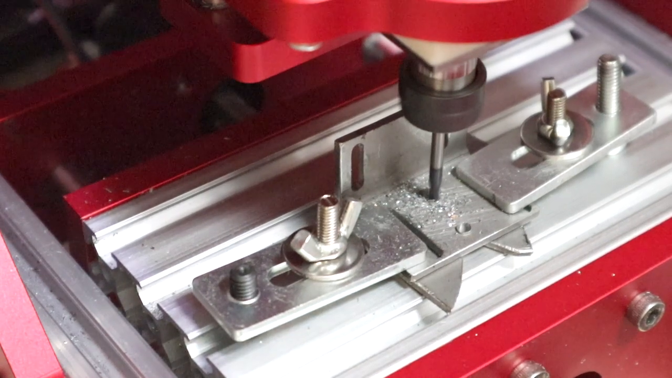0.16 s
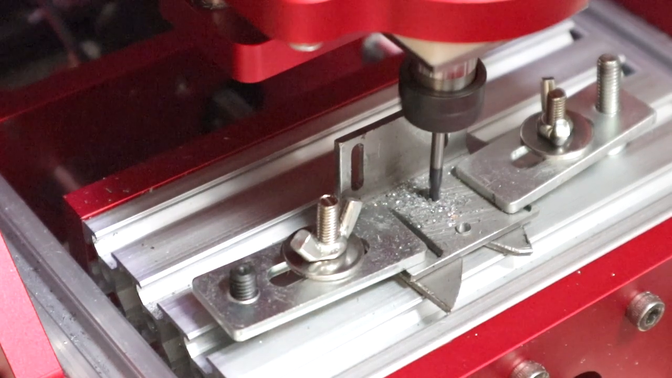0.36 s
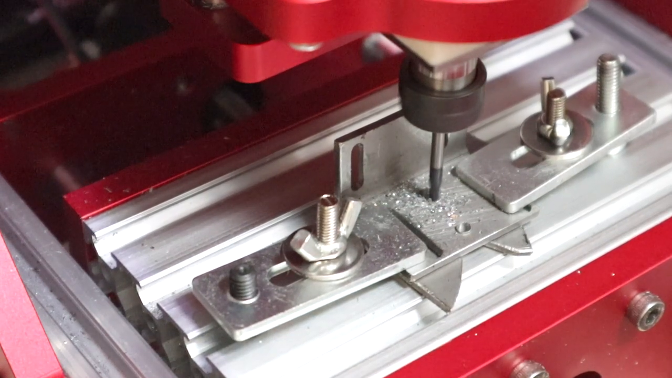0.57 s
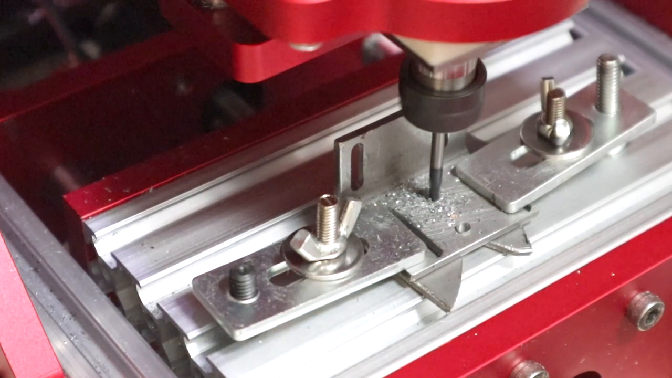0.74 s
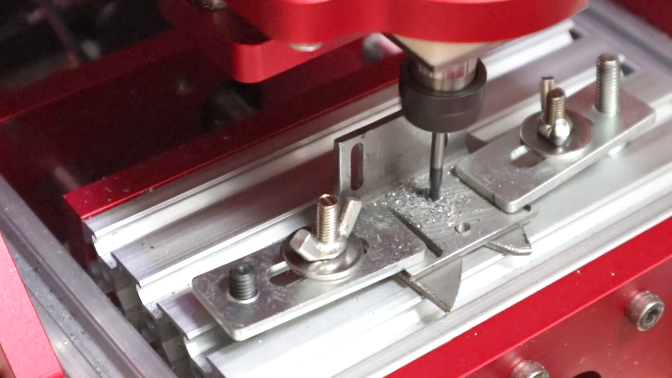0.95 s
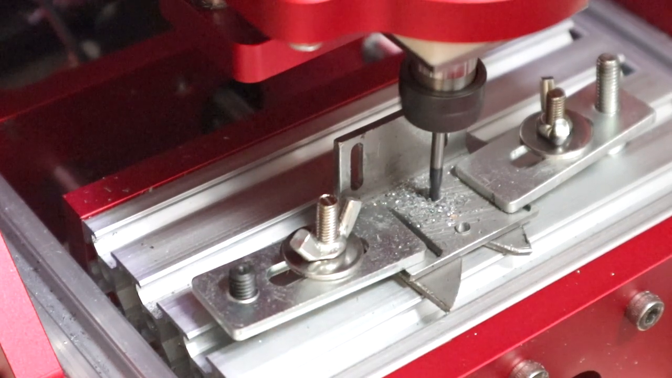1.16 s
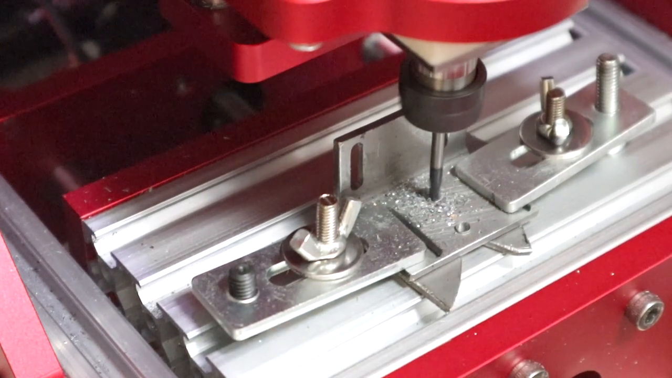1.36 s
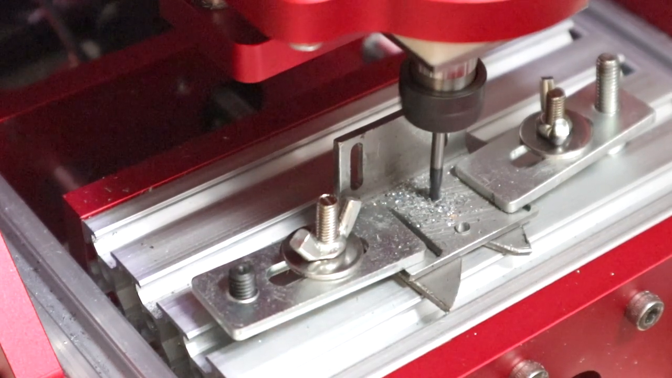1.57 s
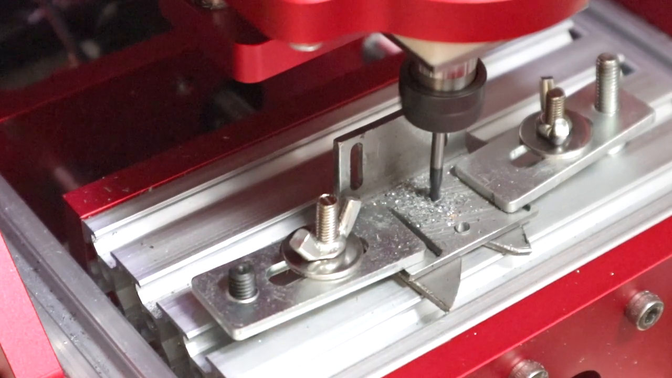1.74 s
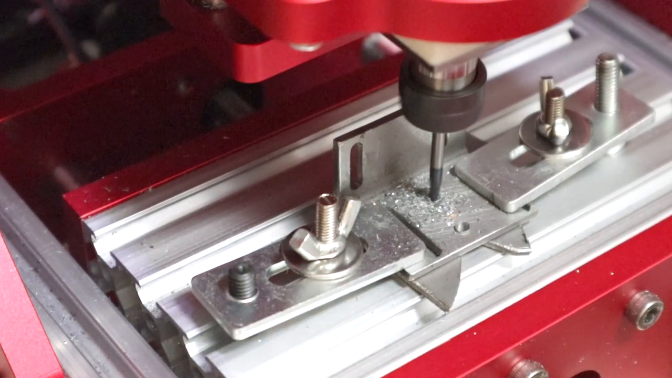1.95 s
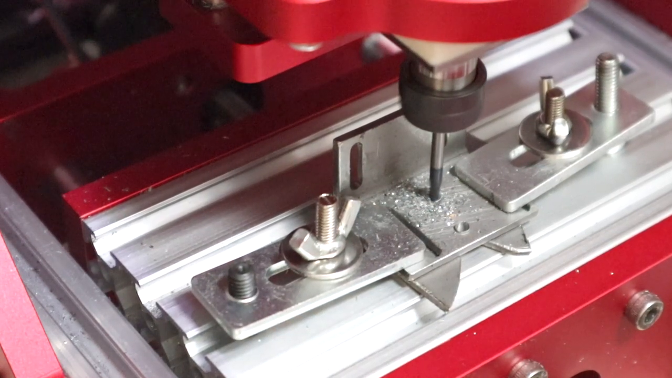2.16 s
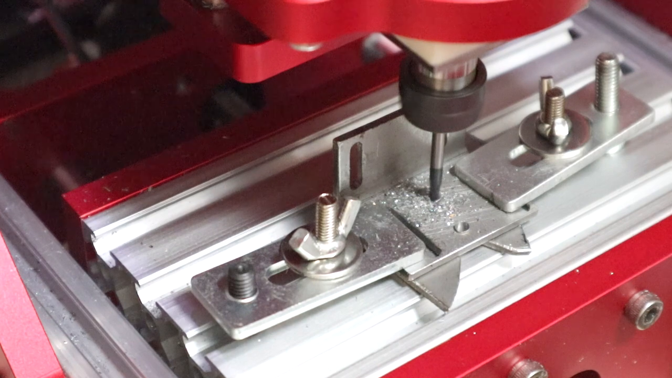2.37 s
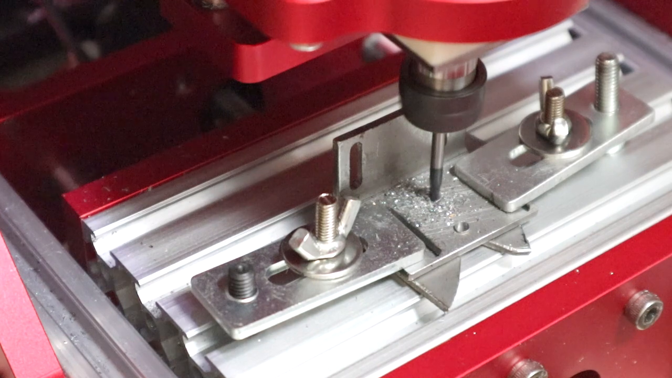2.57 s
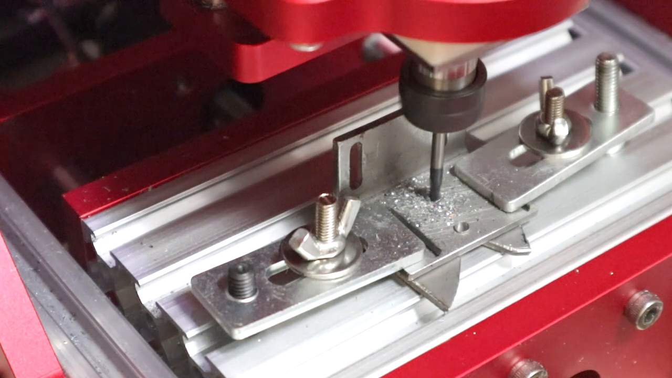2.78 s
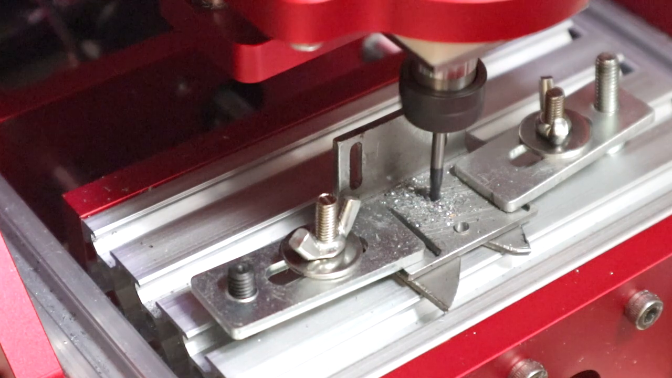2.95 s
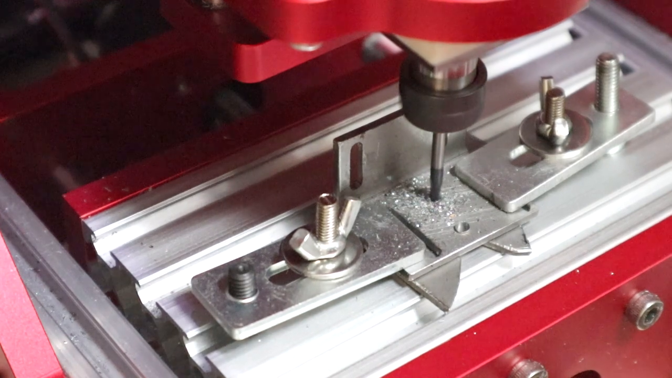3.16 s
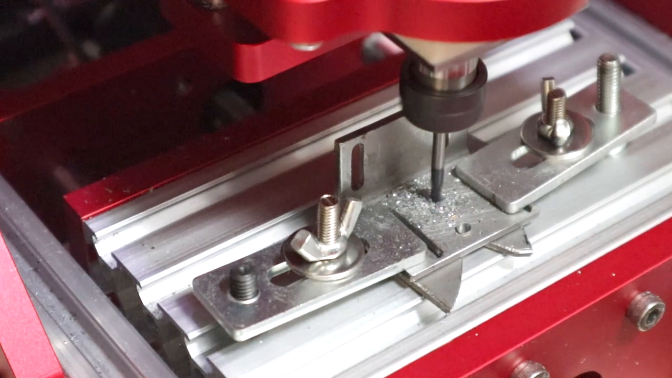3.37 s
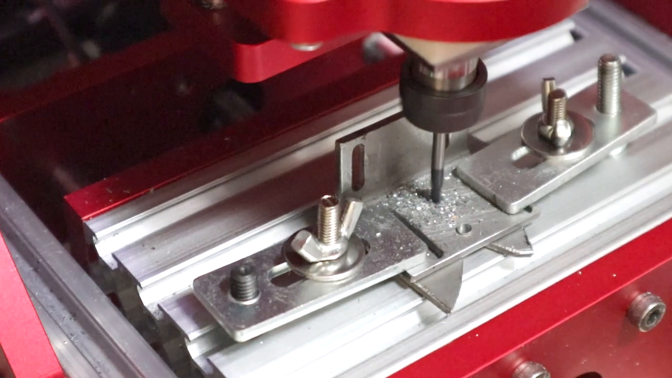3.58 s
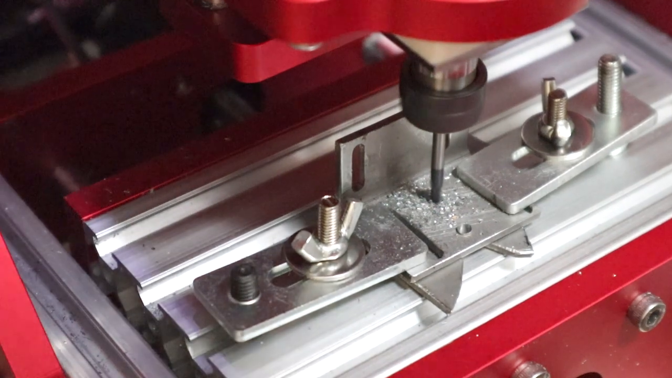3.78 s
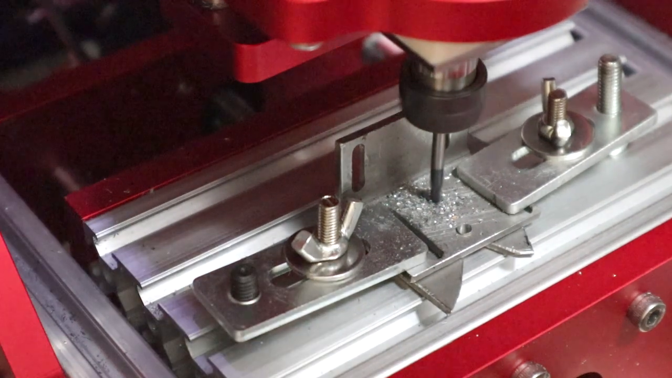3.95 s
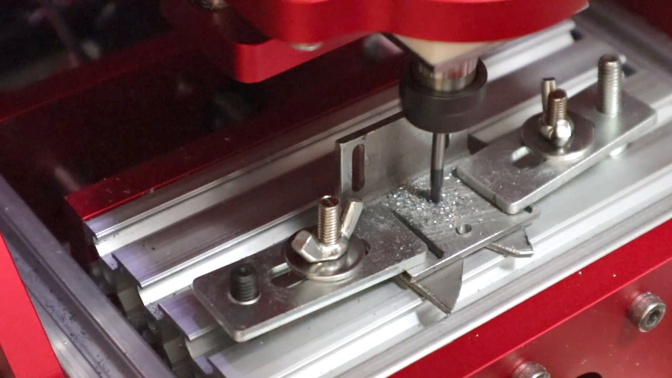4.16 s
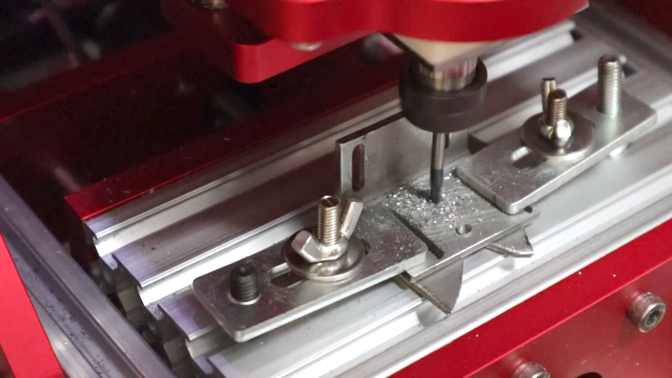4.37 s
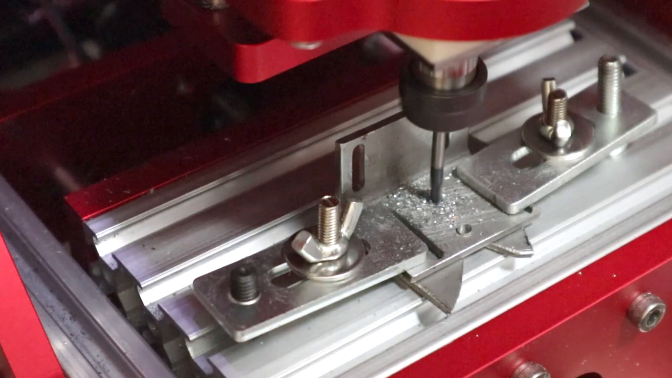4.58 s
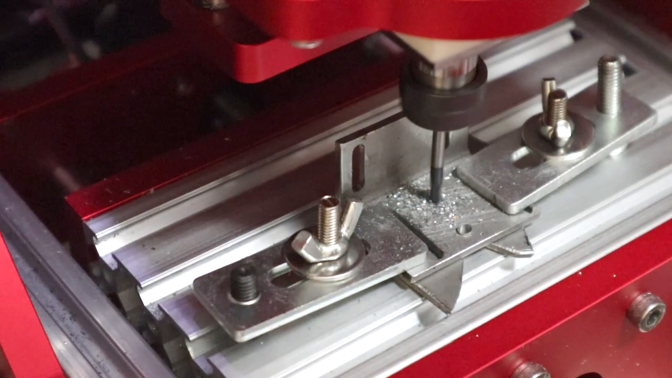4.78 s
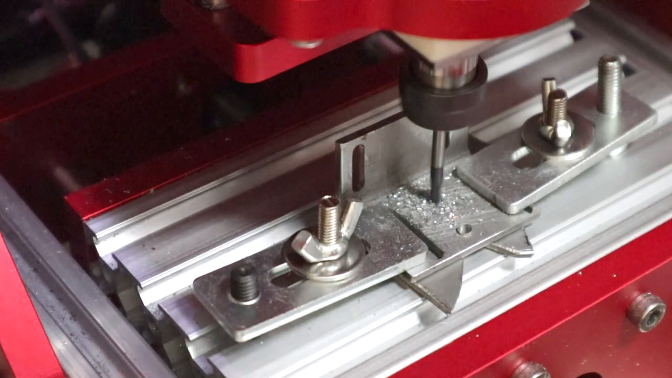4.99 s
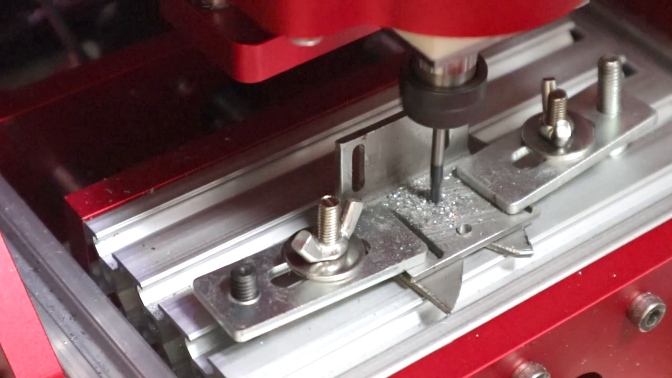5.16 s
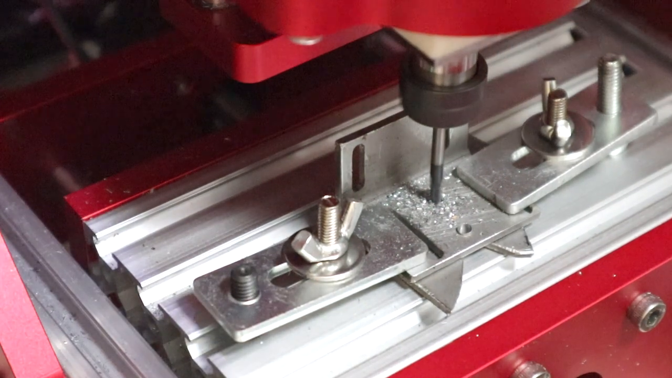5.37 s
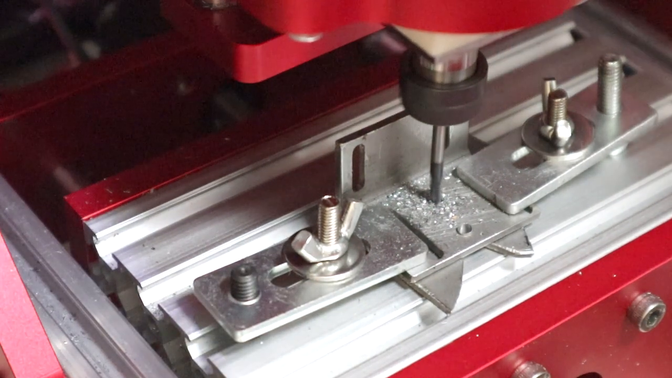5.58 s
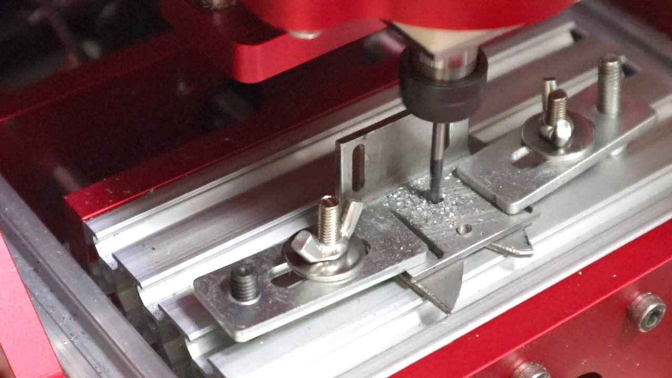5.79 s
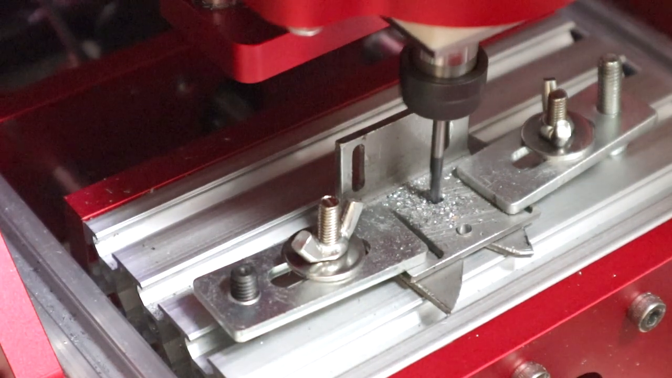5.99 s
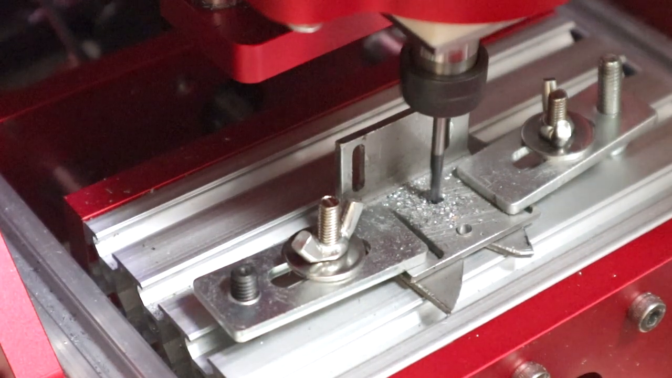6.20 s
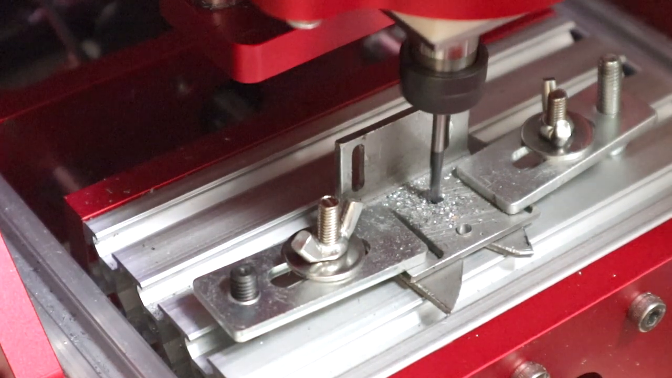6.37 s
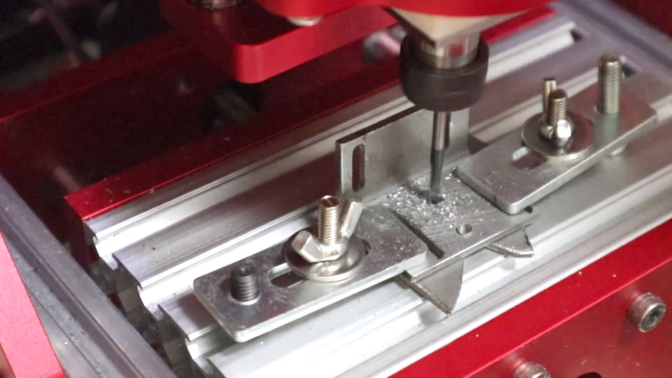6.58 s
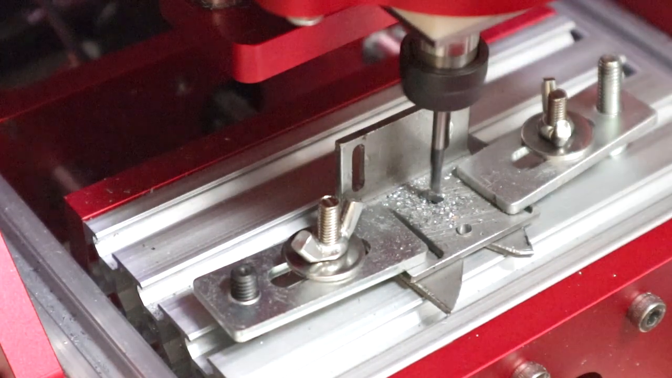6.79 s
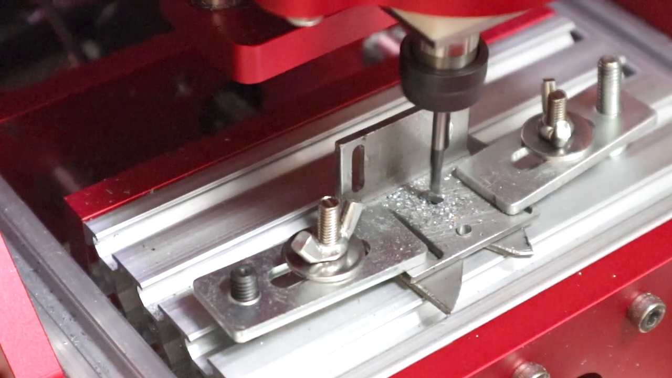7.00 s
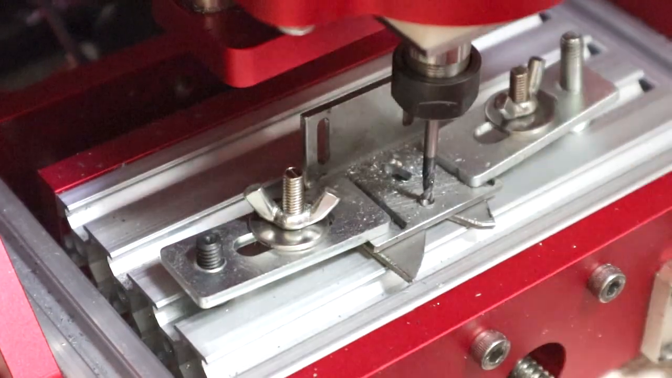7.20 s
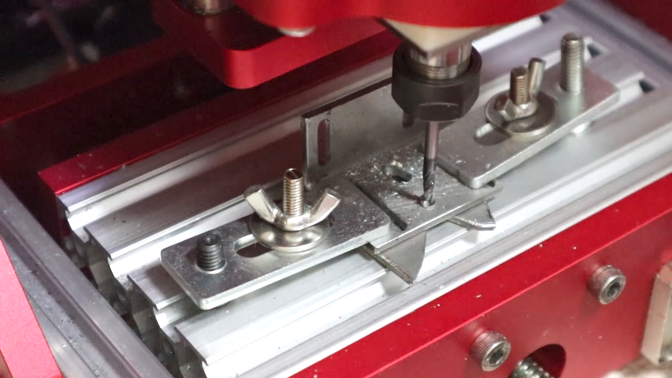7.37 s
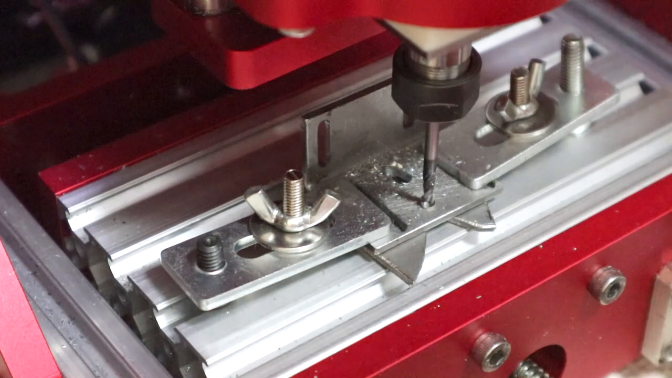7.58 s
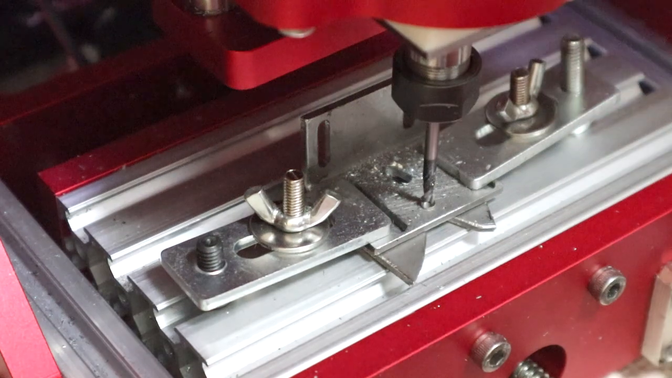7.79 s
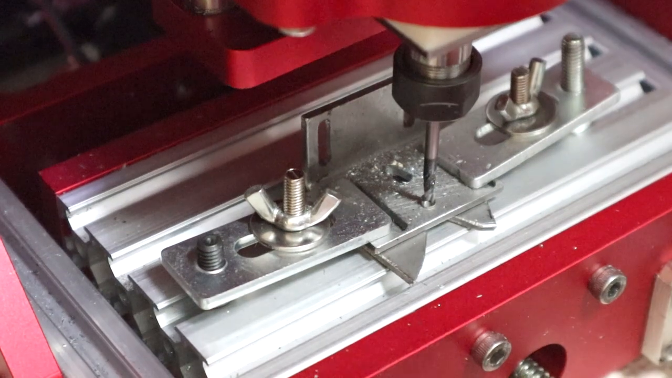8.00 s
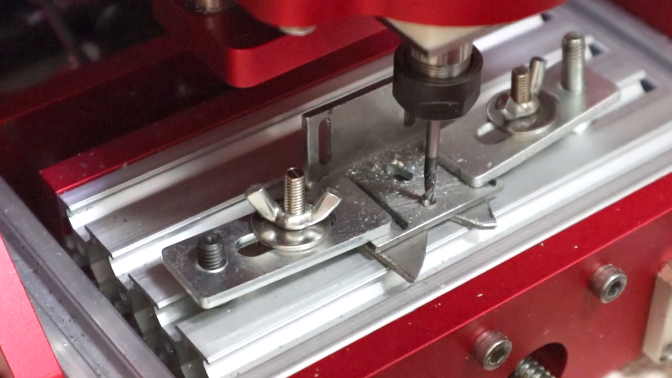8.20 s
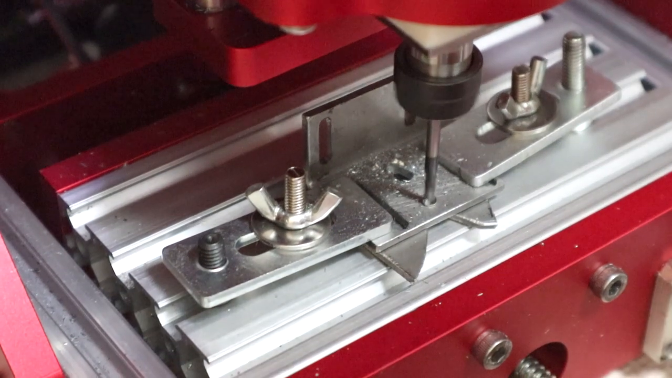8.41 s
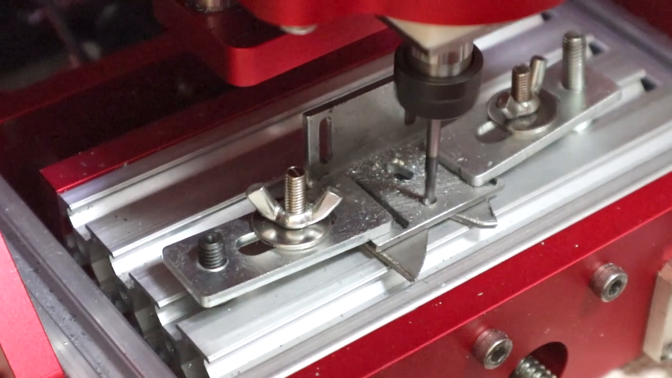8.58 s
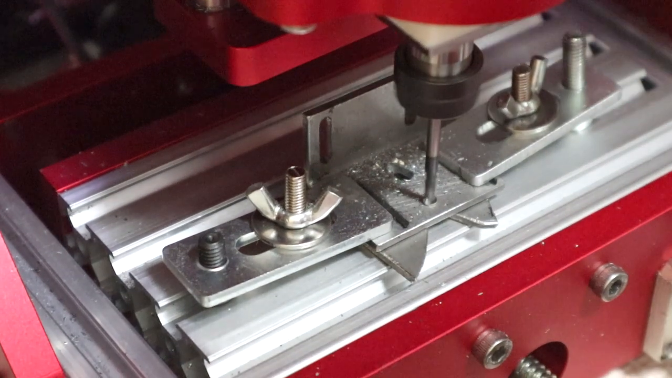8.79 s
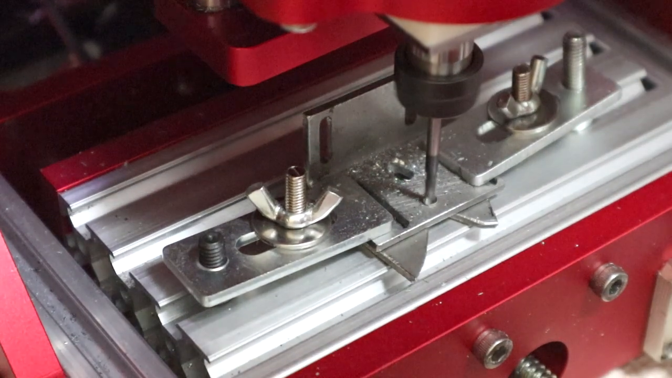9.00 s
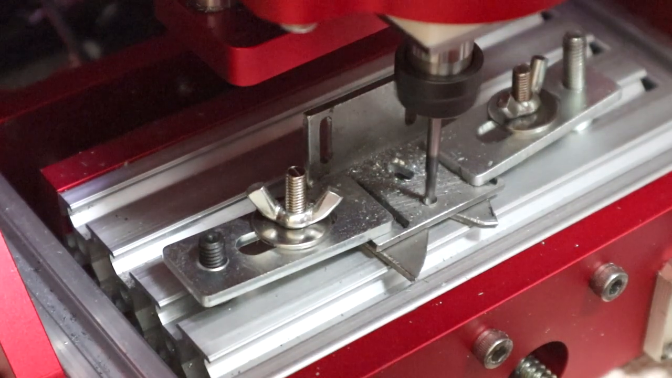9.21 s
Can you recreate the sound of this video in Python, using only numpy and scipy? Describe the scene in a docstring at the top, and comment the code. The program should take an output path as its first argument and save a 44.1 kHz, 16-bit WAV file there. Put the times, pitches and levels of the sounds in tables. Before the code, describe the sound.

Close, gritty metal milling with buzzing chatter and scraping, a freer motor whine, a sudden one-second hush, then a click and spindle restart.

```python
"""A small geared milling machine cuts a thin metal plate, heard from close by.
The cutter's teeth (flutes) shake the clamped plate: chatter at first, then a steady three beats a turn.
Noise in coloured bands makes the gritty chips, the scrape and the hiss; sine tones make the whining gears.
The cutter comes free and the motor whines higher. The sound breaks off and only the quiet room is left,
until a switch restarts the spindle and the gears knock as they settle."""
import sys
import numpy as np
from scipy import signal
from scipy.fft import rfft, irfft, next_fast_len
from scipy.io import wavfile
from scipy.ndimage import uniform_filter1d

SR = 44100
rng = np.random.default_rng(int(sys.argv[2]) if len(sys.argv) > 2 else 0)


def transcribe(u):
    """Save the signal u as a 16-bit wav file named by the first command-line argument.

    u: samples, shape (n,) or (channels, n), limited to [-1, 1]; the rate is SR.
    q: integer samples, one column per channel.
    """
    v = np.clip(np.atleast_2d(u).T, -1, 1)
    q = np.round(v * 32767).astype(np.int16)
    wavfile.write(sys.argv[1], SR, q)


N = 407925
TIME = np.arange(N) / SR  # seconds

# the cutting edge catches: t/s, strength of the blow/dB
SNAGS = [(3.285, -22), (3.374, -24), (3.803, -24), (3.947, -21), (4.06, -24), (4.157, -12), (4.475, -20),
         (4.528, -20), (5.091, -18.5), (5.408, -23), (5.454, -17)]

PINION_TEETH = 16
GEAR_RATIO = 30 / PINION_TEETH  # motor turns per spindle turn
GRIP_S = 3.33  # the cutter takes hold
BREAK_S, RESUME_S, SWITCH_S = 7.166, 7.197, 8.345  # sound breaks off, room returns, switch closes


def undb(db):
    """Turn decibels into a gain."""
    return 10 ** (np.asarray(db) / 20)


def unit(x):
    """Scale to an average (rms) level of 1."""
    return x / np.sqrt(np.mean(np.abs(x) ** 2))


def curves(table):
    """Join the points of a table by straight lines: one curve for each column after the time."""
    t, *columns = np.transpose(table)
    return [np.interp(TIME, t, column) for column in columns]


def colour(x, points):
    """Filter by a spectrum of (Hz, dB) points."""
    size = next_fast_len(N + 4096)
    hz, db = np.transpose(points)
    f = np.maximum(np.arange(size // 2 + 1) * SR / size, 1)
    gain = undb(np.interp(np.log(f), np.log(hz), db))
    return irfft(rfft(x, size) * gain, size)[:N]


def noise():
    """White noise: all frequencies equally strong."""
    return rng.standard_normal(N)


def wander(rate):
    """A smooth random curve with spread 1, changing about rate times a second."""
    smoother = signal.butter(2, rate, fs=SR, output="sos")
    return unit(signal.sosfilt(smoother, noise()))


def resonance(x, hz, width_hz):
    """One resonance rung by x, at rms 1."""
    edges = [hz - width_hz / 2, hz + width_hz / 2]
    band = signal.butter(2, edges, "band", fs=SR, output="sos")
    return unit(signal.sosfilt(band, x))


def bump(s, length_s):
    """A smooth swell from 0 to 1 and back, centred on s."""
    return np.exp(-((TIME - s) / length_s) ** 2)


def ramp(s, length_s):
    """A straight rise from 0 to 1, starting at s."""
    return np.clip((TIME - s) / length_s, 0, 1)


def between(start, end, fade_s):
    """1 from start to end, fading in and out."""
    return np.clip(np.minimum(TIME - start, end - TIME) / fade_s, 0, 1)


def stereo(mid, side):
    """Direct sound in the middle, reflections from the machine's frame to the sides."""
    # how strongly the frame reflects each frequency: f/Hz, side level/dB
    width = [(100, -41.5), (200, -42), (330, -22.5), (620, -26.5), (1100, -27), (2200, -19.5),
             (3600, -10.5), (6300, -3.5), (11000, 3.5)]
    return mid + np.array([[1], [-1]]) * colour(side, width)


def spread(source, side_db=0):
    """Two draws of a noisy source, as direct and reflected sound."""
    return stereo(source(), source() * undb(side_db))


def recur(x, turns, share):
    """Part of what happens on one turn happens again on the next two."""
    one_ago = np.interp(turns - 1, turns, x)
    two_ago = np.interp(turns - 2, turns, x)
    return (x + share * one_ago + share ** 2 * two_ago) / np.sqrt(1 + share ** 2 + share ** 4)


def chips(turns, repeat, grain_db):
    """Tiny fractures around the cutter's rim; the share repeat of their pattern returns on the next turn."""
    cells = 800  # fractures in one turn
    shape = (700, cells)
    uneven_db = grain_db * np.minimum(rng.exponential(size=shape), 6)
    fresh = rng.standard_normal(shape) * undb(uneven_db)
    pattern = signal.lfilter([1], [1, -np.clip(repeat, 0, .95)], fresh, axis=0).ravel()
    return pattern[(turns * cells).astype(int) % pattern.size]


def engagement(leave_s=5.464, release_s=0.28):
    """1 while the cutter is in the plate, dying away as it comes free."""
    return np.exp(-np.maximum(TIME - leave_s, 0) / release_s)


def spindle(restart_hz=58.41, spin_up_s=.021):
    """Turns made so far: the speed follows the cut, and runs up from rest after the switch."""
    # speed sags while the cutter chatters and recovers as it works through: t/s, turns per second f/Hz
    speed = [(0, 53.3), (.5, 52.8), (2.35, 52.62), (3.05, 53.33), (3.2, 53.72), (3.35, 54.84), (3.7, 55.9),
             (4.1, 56.64), (5.0, 57.09), (5.3, 57.4), (6.0, 57.83), (7.2, 57.9)]
    run_up = restart_hz * (1 - np.exp(-np.maximum(TIME - SWITCH_S, 0) / spin_up_s))
    return np.cumsum(np.where(TIME < SWITCH_S, curves(speed)[0], run_up)) / SR


def beats(steady, entry_db=-3.5, entry_s=1.55, grip_db=-11, grip_s=0.091, ease_s=4.75, ease_db_per_s=-5.5,
          chatter_ends=0.62, chatter_left=0.022, chatter_grow_s=0.17, swell_hz=2.4, swell_depth_db=1):
    """Strengths of two beats, three beats and chatter: chatter gives way to three beats as the cut steadies."""
    # two beats build as the cutter enters, drop out as it takes hold and ease towards the far edge
    two_db = entry_db * (1 - ramp(0, entry_s)) + grip_db * bump(GRIP_S, grip_s)
    two_db = two_db + ease_db_per_s * np.maximum(TIME - ease_s, 0)
    swell_db = swell_depth_db * np.cos(2 * np.pi * swell_hz * (TIME - GRIP_S))
    two = undb(-23.5 + two_db) * np.sqrt(engagement())
    three = undb(-17 + swell_db) * steady * np.sqrt(engagement())
    unsteady = np.maximum(1 - steady / chatter_ends, chatter_left)
    chatter = undb(-20.5) * unsteady * ramp(0, chatter_grow_s) * engagement()
    return two, three, chatter


def shake(turns, steady, fourth_db=-21, chatter_fourth_db=-14, sideband_db=-16, chatter_slip=0.13):
    """The clamped plate answers the flutes with low tones; chatter repeats only every second turn."""
    two, three, chatter = beats(steady)
    angle = 2 * np.pi * turns
    slip = chatter_slip * wander(24)
    four = undb(fourth_db) * (two + three) + undb(chatter_fourth_db) * chatter * ramp(0.48, 0.68)
    whole = two * np.sin(2 * angle) + three * np.sin(3 * angle) + four * np.sin(4 * angle + 1 + 3 * slip)
    # half multiples of the turn need two turns to repeat
    halves = np.sin(7 * angle / 2 + slip) + undb(sideband_db) * np.sin(9 * angle / 2 + slip)
    return np.sqrt(2) * (whole * undb(.5 * wander(26)) + chatter * halves * undb(0.69 * wander(6)))


def cutting(turns, depth_db, steady, bite=0.12, burst_db=3.0, crunch_burst_db=2.0, scrape_slope=1.6,
            surge_db=1.7, surge_s=0.1, ring_db=-6, shank_hz=3290, shank_width_hz=460):
    """The frame judders, chips crunch, the edge scrapes (surging at snags) and the cutter's shank rings."""
    # colours of the shaking frame, the breaking chips and the scraping edge, each: f/Hz, level/dB
    judder_colour = [(30, -25), (55, -9), (85, -6.5), (125, -4), (160, -1), (205, -1), (250, -5),
                     (300, -14.5), (370, -22.5), (455, -13.5), (540, -20.5), (800, -29.5), (2000, -53.5)]
    crunch_colour = [(150, -11), (330, -1.5), (530, -7.5), (700, -5), (870, -4.5), (1000, -8.5),
                     (1130, 2.5), (1230, -2.5), (1450, -0.5), (1650, -2.5), (1850, -6.5), (2100, -9),
                     (3000, -14.5), (6000, -42.5)]
    scrape_colour = [(1000, -13), (2000, -15), (2500, -4.5), (2850, 4), (3300, -3), (3700, 0),
                     (3900, -10.5), (4500, -4.5), (5150, -7), (5600, -13), (8000, -14), (11500, -43)]
    surge = surge_db * sum(bump(s, surge_s) for s, db in SNAGS)
    undecided = np.sin(np.pi * steady) ** 2  # half way between chatter and an even cut: most judder
    judder = undb(-26.5 - 12.5 * steady ** 2 + 4 * undecided) * engagement()
    crunch = undb(-25.5 + depth_db)
    scrape = undb(-31 + scrape_slope * depth_db + surge)
    contact = 1 + bite * np.sin(2 * np.pi * turns)  # hardest at one point of each turn
    tearing = wander(110)
    bursts = contact * undb(burst_db * (tearing + wander(24.7)) / np.sqrt(2))
    crumbs = contact * undb(crunch_burst_db * steady * tearing)
    low = spread(lambda: unit(colour(chips(turns, repeat=0.087, grain_db=2.0), judder_colour)))
    mid = spread(lambda: unit(colour(chips(turns, repeat=0.47, grain_db=3.0) * crumbs, crunch_colour)),
                 side_db=4.5)
    high = spread(lambda: unit(colour(chips(turns, repeat=0.21, grain_db=2.0) * bursts, scrape_colour)))
    # the shank rings as it bends
    ring = spread(lambda: resonance(recur(noise(), turns, share=0.67) * bursts, shank_hz, shank_width_hz))
    ringing = np.hypot(scrape * undb(ring_db), snags())
    return low * judder + mid * crunch + high * scrape + ring * ringing


def gears(turns, load, steady, whirr_db, whine_db, slip_free=0.2, slip_loaded=0.44, whine_side_db=8,
          slip_starting=1.2, jitter=0.15, jitter_hz=110):
    """Whine of the small gear (pinion) and lesser tones; slack in the teeth smears the highest most."""
    # gear and commutator tones: multiple of motor speed, then level/dB within the whirr for
    # a chattering cut, an even cut, running free, after the restart
    tone_levels = [(10, -28, -28, -13, -14), (15, -24, -9, -40, -40), (30, -20, -20, -18, -21),
                   (31.7, -32, -24, -12, -14), (32.5, -26, -26, -15, -11), (35, -24, -30, -20, -24),
                   (40, -12, -36, -17, -23), (45, -38, -38, -22, -19), (50, -30, -30, -18, -19),
                   (55, -38, -38, -19, -30), (60, -30, -34, -18, -34), (65, -40, -40, -22, -34),
                   (70, -40, -40, -30, -18), (75, -40, -40, -34, -21)]
    # slip in radians of one tooth
    starting = slip_starting * bump(SWITCH_S, 0.066)
    slip = (slip_free + (slip_loaded - slip_free) * load) * wander(18)
    slip = slip + (jitter + starting) * wander(jitter_hz)
    angle = 2 * np.pi * turns * GEAR_RATIO + slip / PINION_TEETH
    even, held = steady ** 2, engagement()
    tones = []
    for order, chatter_db, even_db, free_db, restart_db in tone_levels:
        cutting_db = chatter_db + (even_db - chatter_db) * even
        clear_db = np.where(TIME < SWITCH_S, free_db, restart_db)
        db = held * cutting_db + (1 - held) * clear_db
        tones.append((order, whirr_db + db + 3.3 * wander(24), 0))
    # the whine reflects most from the frame
    tones.append((PINION_TEETH, whine_db + 2.5 * wander(30), whine_side_db))
    mid, side = 0, 0
    for order, db, side_db in tones:
        gain = undb(db)
        mid = mid + gain * np.sin(order * angle)
        side = side + gain * undb(side_db) * np.sin(order * angle + rng.uniform(0, 2 * np.pi))
    return np.sqrt(2) * stereo(mid, side)


def rattle(turns, load, throb=0.22, repeat=0.36, grain_db=1.3):
    """Loose teeth and bearings: coarse bands that follow the motor, partly repeat and throb once a turn."""
    # bands of rattle: multiple of motor speed, width f/Hz, level running free/dB, level under load/dB
    rattle_bands = [(11.3, 74, -19.5, -18.5), (16.21, 87, -17, -6.5), (30.46, 130, -11.5, -3.5),
                    (32.25, 163, -2.5, -6.5), (36.64, 136, -16.5, -14), (47.4, 280, -16.5, -26.5),
                    (49.6, 88, -17, -29.5), (54.7, 80, -22, -24), (62.2, 180, -21.5, -22.5),
                    (73, 400, -18.5, -26.5)]
    mid, side = 0, 0
    for order, width_hz, free_db, loaded_db in rattle_bands:
        band = wander(width_hz / 2) + 1j * wander(width_hz / 2)
        gain = undb(free_db + (loaded_db - free_db) * load)
        carrier = np.exp(2j * np.pi * order * GEAR_RATIO * turns) * gain
        mid = mid + (band * carrier).real
        side = side + (band[::-1] * carrier).real  # reversed in time, so it differs from the middle
    grain = unit((1 + throb * np.sin(2 * np.pi * turns)) * undb(grain_db * wander(90)))
    return stereo(recur(mid, turns, repeat), recur(side, turns, repeat)) * grain


def wear(turns, slip=.0015):
    """The worn commutator scratches the same fine pattern on every motor turn: a buzz of uneven treble lines."""
    size, lowest, highest = 4096, 22, 110  # steps in a turn; multiples of motor speed
    orders = np.arange(highest)
    lines = rng.standard_normal(highest) + 1j * rng.standard_normal(highest)
    pattern = irfft(lines * (orders >= lowest), size)
    motor_turns = turns * GEAR_RATIO + slip * wander(20)
    return unit(pattern[(motor_turns * size).astype(int) % size])


def brushes(turns, spark=0.27, flicker_db=1.47, wear_db=-8):
    """Brush hiss and buzz, sparking as each commutator bar passes."""
    # colour of the brush and fan noise in the motor housing: f/Hz, level/dB
    housing = [(50, -7.5), (105, 2), (210, -2.5), (380, -9), (460, 5.5), (560, -7.5), (1150, -4),
               (1450, -7.5), (1800, -1.5), (2450, -5.5), (2650, 6), (3000, -3.5), (4000, 0.5), (4400, -2),
               (4680, -13), (4900, -9), (6000, -9), (6270, -13.5), (6600, -6.5), (7000, -9.5), (7320, -11),
               (7600, -10.5), (8200, -8), (10800, -8.5), (11500, -17.5)]
    sparking = 1 + spark * np.sin(2 * np.pi * 10 * GEAR_RATIO * turns)  # ten bars
    gate = sparking * undb(flicker_db * (wander(70) + wander(12.5)) / np.sqrt(2))
    return spread(lambda: unit(colour((noise() + undb(wear_db) * wear(turns)) * gate, housing)))


def drive(turns, steady, unload_s=5.17, unload_length_s=0.54, even_relief=0.26, whirr_load_db=1.5,
          brush_load_db=-1.5, dip_s=0.27, hiss_dip_db=-8, whirr_dip_db=-3.5, restart_db=1):
    """Gear whirr and brush hiss: the cut loads the gears, and both sounds dip once the cutter takes hold."""
    # level of the pinion whine: t/s, level/dB
    whine = [(0, -36.5), (1.2, -31.5), (2.95, -34.5), (3.55, -53), (3.8, -32.5), (4.6, -31.5), (4.9, -40),
             (5.6, -32), (7.15, -40.5), (8.6, -33.5), (9.25, -36.5)]
    # an even cut loads the gears less
    load = np.clip((1 - ramp(unload_s, unload_length_s)) * (1 - even_relief * steady), 0, 1)
    age = np.maximum(TIME - GRIP_S, 0) / dip_s
    dip = age * np.exp(1 - age)
    whirr_db = -30 + whirr_load_db * load + whirr_dip_db * dip + restart_db * (TIME > SWITCH_S)
    whirr = gears(turns, load, steady, whirr_db, curves(whine)[0]) + rattle(turns, load) * undb(whirr_db)
    return whirr, brushes(turns) * undb(-28.5 + brush_load_db * load + hiss_dip_db * dip)


def feed(steady, waver=0.28, frame_hz=450, frame_db=-42, even_db=-5, creep_db=-42.5, clear_db=-41,
         travel_db=-30.5):
    """The table's stepper motor hums at its step rate; the frame sings along, less in an even cut."""
    # tones of the hum: f/Hz, level/dB
    feed_tones = [(167, -3.5), (334, -19), (450, -17)]
    hum = sum(undb(db) * np.sin(2 * np.pi * hz * TIME + waver * wander(16.0)) for hz, db in feed_tones)
    # the frame sings while the cutter pushes on it
    frame = np.sin(2 * np.pi * frame_hz * TIME + 2 * waver * wander(17)) * engagement()
    # creeping through the cut, clear of the plate, travelling after the restart
    before_db = clear_db + (creep_db - clear_db) * engagement()
    hum_db = np.where(TIME < SWITCH_S, before_db, travel_db)
    hum = hum * undb(hum_db + 1.5 * wander(8.2))
    return np.sqrt(2) * (hum + frame * undb(frame_db + even_db * steady + 2 * wander(24)))


def singing(turns, fade_s=0.06, slip=.55, flutter_db=2.5):
    """The plate locks to the flutes and sings: wavering tones on whole and half multiples of spindle speed."""
    # short tones: start t/s, end t/s, multiple of spindle speed, level/dB
    sung_tones = [(1.4, 3.25, 17, -43.5), (0, 3.2, 21, -47), (0, 2.7, 60, -39.5), (3.68, 4.15, 49.5, -38.5),
                  (3.37, 3.72, 16.5, -35), (3.68, 3.92, 15, -36), (3.85, 4.15, 16, -33),
                  (4.08, 4.5, 15.5, -39), (4.5, 5, 16, -37.5), (4.45, 4.87, 14.5, -35),
                  (4.45, 4.8, 12.5, -39), (4.45, 5.05, 28, -36.5), (4.76, 5.08, 24, -32.5),
                  (5.32, 5.69, 8.5, -35), (5.56, 5.77, 10.5, -38.5)]
    out = 0
    for start, end, order, db in sung_tones:
        gain = undb(db + flutter_db * wander(35.5)) * between(start, end, fade_s)
        out = out + gain * np.sin(2 * np.pi * order * turns + slip * wander(12))
    return np.sqrt(2) * out


def workshop(diffuse_db=-55.5, flicker_db=2.3):
    """Uneven low rumble of the room, alike in both ears, under a faint diffuse hiss."""
    # colours of the rumble and of the hiss, each: f/Hz, level/dB
    rumble_colour = [(25, -15.5), (48, -9), (69, -8), (81, -3.5), (101, -5), (152, -26.5), (223, -21),
                     (518, -33), (1760, -41.5), (3000, -47.5), (4500, -62), (11000, -77)]
    hiss_colour = [(30, -14.5), (65, -20.5), (227, -2), (953, -1.5), (2620, -5), (3620, -8), (5790, -12),
                   (11000, -24.5)]
    diffuse = unit(colour(noise(), hiss_colour)) * undb(diffuse_db)
    rumble = unit(colour(noise(), rumble_colour)) * undb(-42 + flicker_db * wander(20))
    return rumble + np.array([[1], [-1]]) * diffuse


def jolts(hz=56, rise_s=0.025):
    """Each grab of the cutter rocks the table on its feet for a few cycles."""
    # the cutter grabs: t/s, peak level/dB
    grabs = [(.165, -21), (1.167, -21), (1.482, -25), (1.97, -22), (2.168, -25.5), (2.488, -23),
             (3.166, -24)]
    out = 0
    for s, db in grabs:
        age = np.maximum(TIME - s, 0)
        envelope = (age / rise_s * np.exp(1 - age / rise_s)) ** 2
        out = out + undb(db) * envelope * np.sin(2 * np.pi * hz * age)
    return out


def growl(turns, fade_s=0.046, rough_db=2.0, drift_s=0.00029):
    """Uneven knocks, partly recurring every second turn, ring the plate's drifting resonances."""
    # resonances as the cutter moves on: start t/s, end t/s, centre f/Hz, width f/Hz, level/dB
    growl_bands = [(2.45, 2.983, 1643, 140, -32.5), (2.6, 3.7, 890, 35, -38.5),
                   (4.1, 4.898, 850, 160, -38.5), (3.2, 3.457, 1110, 220, -24.5),
                   (3.32, 3.618, 980, 190, -33.5), (3.4, 4.2, 900, 215, -36), (3.2, 4, 470, 200, -37),
                   (3.55, 4.85, 1160, 130, -35), (4.42, 4.715, 1650, 120, -32.5),
                   (4.75, 5.25, 1470, 280, -31), (5.28, 5.46, 1290, 180, -30.5), (5.3, 5.62, 197, 28, -34),
                   (5.7, 5.99, 142, 54, -30.5), (2.1, 3.202, 213, 40, -29.5), (4.78, 5.08, 4944, 1000, -33)]
    blows = chips(turns / 2, repeat=0.42, grain_db=2.5) * undb(rough_db * wander(55))
    out = 0
    for start, end, hz, width_hz, db in growl_bands:
        out = out + resonance(blows, hz, width_hz) * undb(db) * between(start, end, fade_s)
    # the resonances drift as the cutter presses on the plate
    out = np.interp(TIME + drift_s * wander(7.1), TIME, out)
    return stereo(out, np.roll(out, SR // 300))


def snags(decay_s=0.0079, rise_s=0.0013, again_db=-6.0, turn_s=.0175):
    """Loudness of the shank's ringing: the edge catches, and again more weakly on the next two turns."""
    blows = np.zeros(N)
    for s, db in SNAGS:
        for turn in range(3):
            blows[int((s + turn * turn_s) * SR)] += undb(db + again_db * turn)
    fading = signal.lfilter([1], [1, -np.exp(-1 / (decay_s * SR))], blows)
    return uniform_filter1d(fading, int(rise_s * SR) + 1)


def throbs(hz=178, length_s=0.019):
    """Each bump of the leaving cutter against the far edge swings the plate for a few cycles."""
    # the bumps: t/s, peak level/dB
    edge_bumps = [(5.585, -21), (5.624, -23), (5.70, -15), (5.74, -17), (5.78, -25), (5.87, -31),
                  (5.931, -24.5)]
    return sum(undb(db) * bump(s, length_s) * np.cos(2 * np.pi * hz * (TIME - s)) for s, db in edge_bumps)


def switch(db=-28, decay_s=0.0078):
    """The contact snaps shut: a burst of bright noise that dies away at once."""
    age = TIME - SWITCH_S
    shape = [(300, -18), (2800, -22), (3900, 3), (6000, 2), (11000, -9)]  # Hz, dB
    snap = spread(lambda: unit(colour(noise(), shape)))
    return snap * undb(db) * (age > 0) * np.exp(-np.abs(age) / decay_s)


def start_up(db=-26, peak_s=8.39, width_s=0.018, rise_per_s=5, grit_db=2.5):
    """The gears take up their slack with a short rasp that rises in pitch."""
    age = np.clip(TIME - peak_s, -3 * width_s, 3 * width_s)
    rising = TIME + rise_per_s * age ** 2 / 2  # read the noise ever faster
    shape = [(60, -10), (170, 12), (300, -6), (800, -7), (1400, 2), (2200, -16), (3050, 10), (3500, -8),
             (4100, -4), (4700, -16), (11000, -28)]  # Hz, dB
    grit = undb(grit_db * wander(200))
    rasp = spread(lambda: np.interp(rising, TIME, unit(colour(noise() * grit, shape))))
    return rasp * undb(db) * bump(peak_s, width_s)


def knocks(hz=3550, width_hz=300, length_s=0.0036):
    """The gear teeth knock while they settle, and each knock rings the pinion briefly."""
    # the knocks: t/s, peak of the loudness curve/dB
    tooth_knocks = [(8.443, -24), (8.494, -25), (8.528, -23), (8.665, -24), (8.677, -21), (8.736, -19.5)]
    ring = spread(lambda: resonance(noise(), hz, width_hz))
    return ring * sum(undb(db) * bump(s, length_s) for s, db in tooth_knocks)


def scene(swell_in_s=0.063, free_s=0.16, mesh_s=8.38, mesh_rise_s=0.042):
    """Motor, cut and room, with the break and the restart."""
    # the cut: t/s, depth of the bite as level/dB, steadiness from 0 = chattering to 1 = even
    cut = [(0, -2.5, 0.034), (2.3, -3.5, 0.033), (3.17, -2.5, 0.37), (3.28, -1, 0.8), (4.4, -.5, 0.74),
           (5.08, 0, 0.84), (5.45, -0.5, 0.15), (5.72, -4.5, 0.3), (5.95, -20, 0.37)]
    turns = spindle()
    depth_db, steady = curves(cut)
    steady = np.clip(steady, 0, 1)
    whirr, hiss = drive(turns, steady)
    touching = np.exp(-np.maximum(TIME - cut[-1][0], 0) / free_s)  # the last contact ends
    contact = shake(turns, steady) + cutting(turns, depth_db, steady) + growl(turns) + singing(turns)
    work = contact * touching + jolts() + throbs()
    before = np.exp(-np.maximum(TIME - BREAK_S, 0) / 0.0032)  # everything breaks off
    restart = ramp(SWITCH_S, swell_in_s)  # the hiss and hum swell in from the switch on
    meshing = ramp(mesh_s, mesh_rise_s)  # the gears mesh cleanly once the slack is taken up
    machine = work * before + (hiss + feed(steady)) * (before + restart) + whirr * (before + meshing)
    resumed = np.clip((TIME - RESUME_S) / 0.013, .08, 1)  # the quiet room comes back
    return machine + workshop() * np.maximum(before, resumed) + switch() + start_up() + knocks()


def record(dry, top_hz=11400):
    """A steep cut of everything above top_hz."""
    return signal.sosfilt(signal.ellip(10, .2, 80, top_hz, fs=SR, output="sos"), dry)


dry = scene()
out = record(dry)
transcribe(out)
```